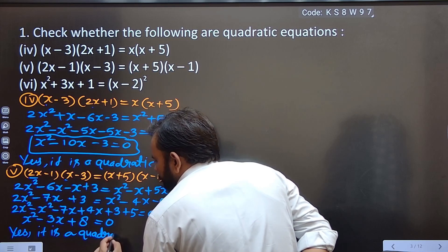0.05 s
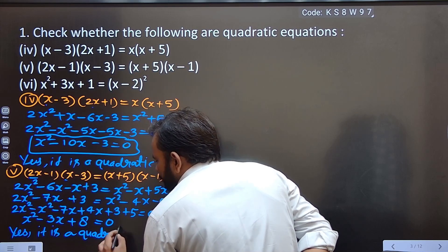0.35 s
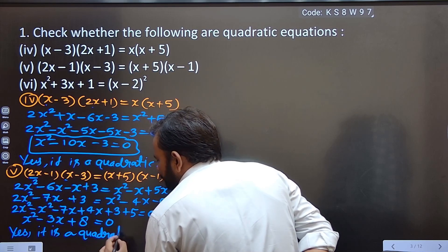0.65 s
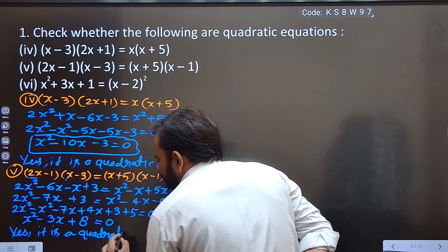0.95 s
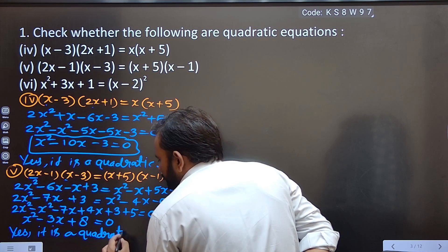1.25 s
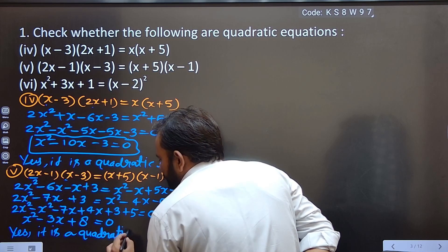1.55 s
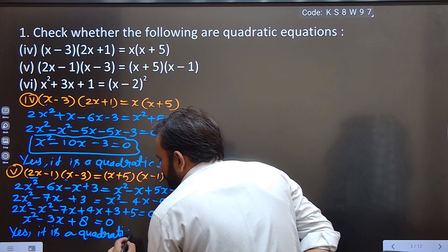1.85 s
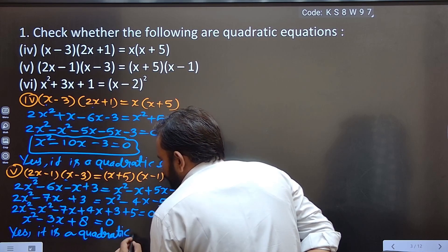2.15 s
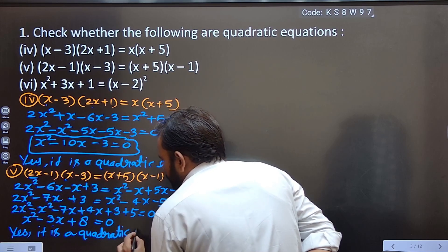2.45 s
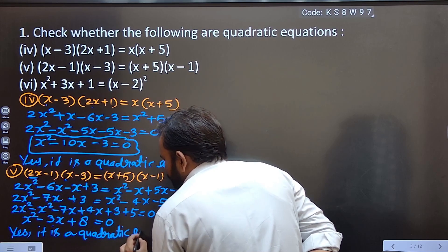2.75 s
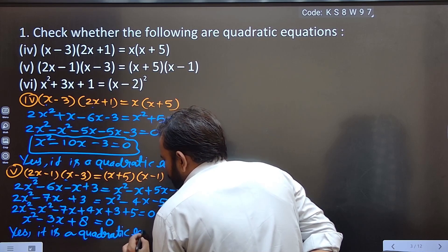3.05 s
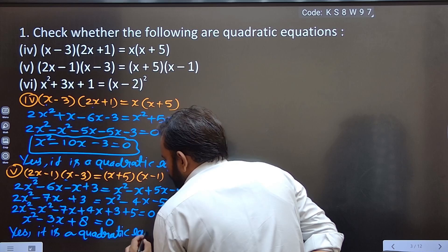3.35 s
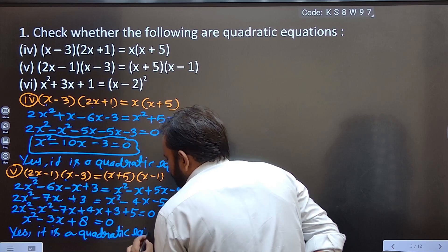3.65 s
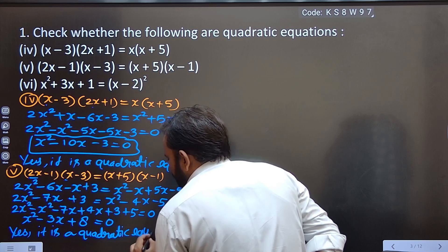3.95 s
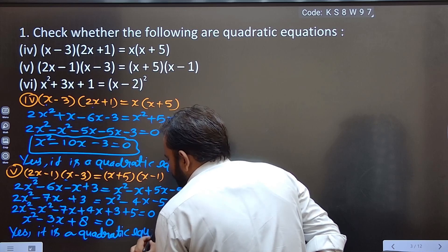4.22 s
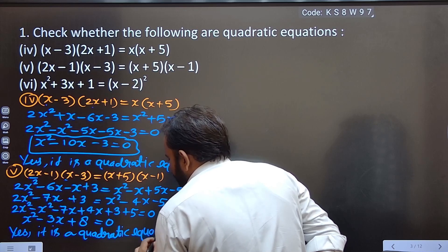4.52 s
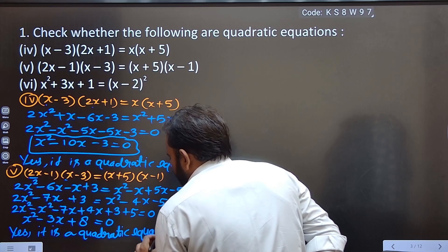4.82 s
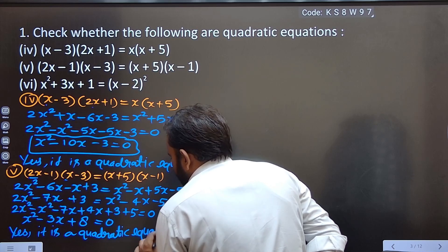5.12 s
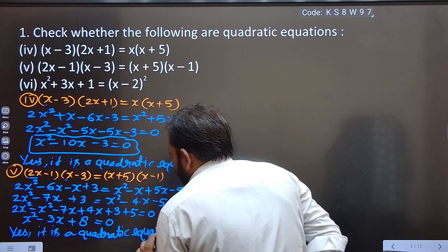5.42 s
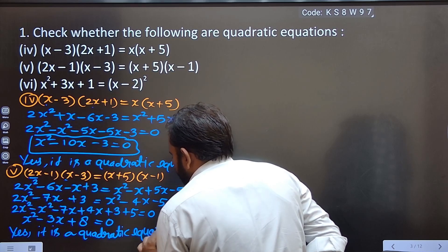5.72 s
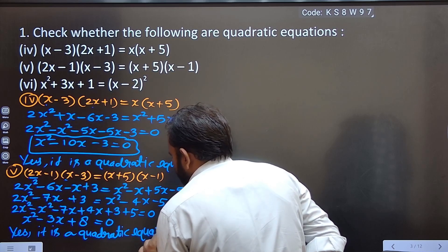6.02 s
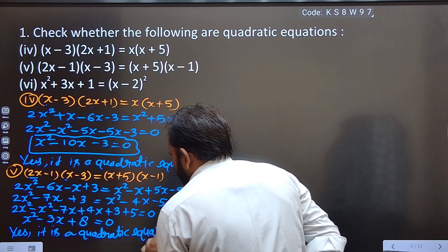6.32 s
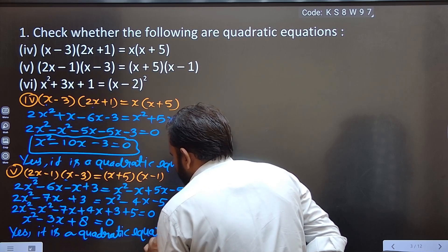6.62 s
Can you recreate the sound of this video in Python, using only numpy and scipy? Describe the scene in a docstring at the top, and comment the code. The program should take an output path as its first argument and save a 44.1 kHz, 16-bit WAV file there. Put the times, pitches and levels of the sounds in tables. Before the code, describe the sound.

Light knocks and thin, scratchy pen strokes on a large touchscreen in a quiet room with a low, throbbing hum.

```python
"""Someone writes on a large touchscreen in a quiet classroom. From the outset a low, throbbing hum with a
slight flutter lies under faint electronic whines and room air, and the sliding stylus makes a thin friction
hiss whose resonance glides through each stroke. From 0.66 s soft landings excite the modes of the glass
panel. Light ticks follow from 1.2 s, the first just before a faint stick-slip squeak. From 4 to 6.5 s the
hum's upper harmonics swell, and the hardest tap ends the scene."""
import sys
import numpy as np
from scipy import signal
from scipy.fft import rfft, irfft, next_fast_len
from scipy.io import wavfile
from scipy.ndimage import uniform_filter1d, map_coordinates

SR = 44100
rng = np.random.default_rng(int(sys.argv[2]) if len(sys.argv) > 2 else 0)


def int16_out(signal):
    """Quantize to a 16-bit WAV file."""
    q = np.round(np.clip(np.atleast_2d(signal).T, -1, 1) * 32767)
    wavfile.write(sys.argv[1], SR, q.astype(np.int16))


N = 302967


def amp(db):
    """Amplitude ratio of a level in decibels."""
    return 10 ** (np.asarray(db) / 20)


def unit(x):
    """Normalisation to rms 1."""
    return x / np.sqrt(np.mean(x ** 2) + 1e-20)


def along(points, hz):
    """Interpolation of (frequency, value) points on a logarithmic frequency axis."""
    f, v = np.transpose(points)
    return np.interp(np.log(hz + 1), np.log(f + 1), v)


def wobble(rate):
    """Smooth random modulation: a spline through rate Gaussian knots a second."""
    return map_coordinates(rng.standard_normal(int(N * rate / SR) + 4), [np.arange(N) * rate / SR])


def filtered(x, response):
    """Linear filtering: the spectrum of x times a frequency response."""
    size = next_fast_len(x.shape[-1] + 8192)
    return irfft(rfft(x, size) * response(np.fft.rfftfreq(size, 1 / SR)), size)[..., :x.shape[-1]]


def noise(spectrum):
    """Spectral shaping of white noise, at rms 1."""
    return unit(filtered(rng.standard_normal(N), lambda hz: amp(along(spectrum, hz))))


def narrow(width_hz, size=N):
    """Complex envelope of narrow-band noise with this half width."""
    half = lambda: filtered(rng.standard_normal(size), lambda hz: 1 / (1 + (hz / width_hz) ** 3))
    return unit(half()) + 1j * unit(half())


def band(envelope, hz):
    """Modulation shifts a complex envelope to a steady or gliding centre frequency."""
    return np.real(envelope * np.exp(2j * np.pi * np.cumsum(hz + np.zeros(len(envelope))) / SR))


def add(track, s, sound):
    """Superposition of a sound on the track at time s."""
    part = track[max(round(s * SR), 0):][:len(sound)]
    part += sound[:len(part)]


# lower and upper harmonics of the hum: (harmonic number, level [dB])
LOW_HARMONICS = [(1, -44.5), (2, -53), (3, -65.5)]
UPPER_HARMONICS = [(4, -69.5), (5, -65), (6, -66.5), (7, -79), (8, -75.5), (9, -76)]
# mains lines and electronic whines: (frequency [Hz], level [dB])
WHINES = [(50, -63.5), (100, -66.5), (124, -73.5), (200, -79), (300, -76), (339, -76), (362, -87.5),
          (449, -80.5), (1582, -93.5), (2272, -99.5), (7897, -102), (7998, -100), (11719, -111),
          (13706, -109)]
HUM_HZ, UPPER_DELAY_S, UPPER_REST_DB = 30, .0173, -0.65
SWELL_START_S, SWELL_END_S, SWELL_DB = 4.02, 6.48, 3.87


def hum():
    """A harmonic series, amplitude-modulated every fourth cycle and pulsed every twelfth, with whines."""
    t = np.arange(N) / SR

    def tone(hz, db, delay):
        """A sinusoid with slow random amplitude and phase modulation."""
        return amp(db + 1.1 * wobble(3.4)) * np.cos(2 * np.pi * hz * (t - delay) + .35 * wobble(3))

    cycle = HUM_HZ * (t - .105)
    buzz = -sum(amp(db + 0.2 * wobble(3.5)) * np.cos(2 * np.pi * k * cycle) for k, db in LOW_HARMONICS)
    throb = np.cos(2 * np.pi * cycle / 4)
    from_kick_s = ((cycle + 6) % 12 - 6) / HUM_HZ
    kick = amp(-43) * np.exp(-(from_kick_s / 0.0077) ** 2)
    progress = np.clip((t - SWELL_START_S) / (SWELL_END_S - SWELL_START_S), 0, 1)
    swell = np.sqrt(np.abs(np.sin(np.pi * progress)))
    # harmonics in phase add up to one soft pulse a cycle
    drone = sum(tone(k * HUM_HZ, db, UPPER_DELAY_S) for k, db in UPPER_HARMONICS)
    drone *= amp(UPPER_REST_DB + SWELL_DB * swell)
    whines = sum(tone(hz, db, rng.uniform()) for hz, db in WHINES)
    return buzz * (1 + 0.028 * throb) - amp(-60.5) * throb - kick + drone + whines


# three impulses in each cycle of the hum: (delay [s], level [dB])
FLUTTER_IMPULSES = [(.0116, -67), (.0173, -60.7), (.0278, -68.5)]
# the modes they excite: (frequency [Hz], relative level [dB], 60 dB decay time [s])
FLUTTER_RESONANCES = [(330, -6, .02), (660, 0, .014), (1350, -4, .008)]


def flutter():
    """A jittered impulse train in step with the hum excites damped modes: tiny, dull, uneven ticks."""
    impulses, t = np.zeros(N), np.arange(SR // 25) / SR
    ring = sum(amp(db - 60 * t / t60) * np.sin(2 * np.pi * hz * t) for hz, db, t60 in FLUTTER_RESONANCES)
    ring *= 1 - np.exp(-t / .0008)
    cycles = np.arange(0, N / SR, 1 / HUM_HZ)
    for delay, db in FLUTTER_IMPULSES:
        late, size = rng.standard_normal((2, len(cycles)))
        at = np.round((cycles + delay + .0004 * late) * SR).astype(int)
        impulses[np.clip(at, 0, N - 1)] += amp(db + 2 * size)
    return signal.fftconvolve(impulses, ring)[:N]


# room noise: (frequency [Hz], relative spectral density [dB])
AIR_SPECTRUM = [(15, -17), (30, -2.5), (65, -16.5), (100, -15), (170, -21.5), (250, -26.5), (400, -29.5),
                (600, -36.5), (1000, -43.5), (1300, -50.5), (1620, -51.5), (2000, -54), (5000, -60.5),
                (8000, -84)]


def air():
    """Ambient noise, nearly stationary, with its energy at low frequencies."""
    return noise(AIR_SPECTRUM) * amp(-55 + 0.77 * wobble(11))


# hiss common to both channels: (frequency [Hz], relative spectral density [dB])
HISS_SPECTRUM = [(2500, -0.5), (4500, -11.5), (5500, -2.5), (6700, 3), (8000, 0), (9300, -3), (11000, -4.5),
                 (13500, -5), (15700, -2.5)]


def hiss():
    """Electronic noise floor: an in-phase and an antiphase part make the channels partly coherent."""
    common = amp(-84.5) * noise(HISS_SPECTRUM)
    side = amp(-90) * noise([(30, 25.5), (100, 2), (300, -52), (600, -3),
                             (2000, 7.5), (8000, 10), (15000, 10.5)])
    return np.array([common + side, common - side])


def patchy(x, depth_db):
    """Random gain over time and frequency makes resonances come and go."""
    spectra = signal.stft(x, nperseg=256)[2]
    field = uniform_filter1d(rng.standard_normal(spectra.shape), size=4, axis=0)
    field = uniform_filter1d(field, size=22, axis=1)
    return signal.istft(spectra * amp(depth_db * unit(field)), nperseg=256)[1][:N]


# slides of the tip: (start [s], duration [s], whistle level [dB], from [Hz], to [Hz], half width [Hz],
# sizzle level [dB], sizzle centre [Hz], scrape level [dB])
PEN_STROKES = [(0.0, 0.13, -85.5, 8940, 7660, 700, -88, 12500, -96),
               (0.12, 0.16, -85, 9700, 9500, 1200, -82.5, 12700, -91),
               (0.318, 0.16, -79, 9600, 8000, 1100, -84, 12700, -90),
               (0.71, 0.091, -84.5, 8400, 8250, 1000, -81.5, 13600, -89),
               (0.984, 0.1, -83, 8800, 8700, 1110, -88, 13100, -90),
               (1.607, 0.064, -81.5, 9500, 9450, 800, -80.5, 13300, -79.5),
               (1.673, 0.087, -79.5, 8840, 7700, 700, -86, 13000, -91),
               (2.19, 0.17, -86, 7900, 7480, 600, -82.5, 12900, -86),
               (2.395, 0.16, -79, 8930, 7760, 900, -84, 13600, -86),
               (2.715, 0.068, -83.5, 7840, 7400, 500, -86, 13800, -88),
               (2.746, 0.12, -84, 9160, 7700, 800, -88, 12900, -90),
               (2.857, .1, -96, 8200, 8000, 800, -91, 12300, -95),
               (3.029, 0.14, -80.5, 8550, 8350, 1000, -88, 13300, -85),
               (3.391, 0.11, -85, 8600, 8300, 900, -90, 13200, -85),
               (3.48, .19, -91, 8300, 8100, 1100, -91, 12800, -86),
               (3.686, 0.11, -84.5, 8000, 8300, 800, -92, 13400, -84),
               (3.988, 0.12, -86, 8870, 7900, 1000, -90, 13300, -83),
               (4.29, 0.21, -92, 8360, 7730, 800, -87.5, 12260, -87.5),
               (4.495, 0.11, -87, 7500, 7300, 700, -81, 12600, -87),
               (4.647, 0.15, -87, 8370, 8200, 900, -81, 13000, -84),
               (5.004, 0.064, -92, 7700, 7600, 900, -87, 12200, -89),
               (5.193, 0.093, -84, 7880, 8000, 450, -83, 12600, -85),
               (5.3, 0.16, -91, 8330, 8100, 1300, -99, 12500, -91),
               (5.743, 0.12, -88, 8170, 7900, 500, -87, 12800, -86),
               (5.96, .06, -94, 7700, 7600, 700, -91, 12500, -94),
               (6.122, 0.095, -92, 7460, 7370, 600, -87, 11600, -93),
               (6.26, 0.1, -92, 7900, 8050, 500, -90, 13000, -86),
               (6.41, 0.14, -95, 7840, 7800, 800, -96, 12000, -99),
               (6.589, 0.063, -95, 8250, 8240, 700, -84, 12900, -85)]
# broadband friction: (frequency [Hz], relative spectral density [dB])
SCRAPE_SPECTRUM = [(2500, -9), (3400, -12), (3850, -3.5), (4400, -24.5), (6500, -7.5), (7400, -7.5),
                   (7950, 0.5), (8700, -8.5), (9600, -9.5), (10300, -7), (11000, -14), (12000, -10),
                   (13700, -15.5), (15000, -26)]
# the stylus colours whistle and sizzle: (frequency [Hz], half width [Hz], gain [dB])
STYLUS_RESONANCES = [(7980, 130, 6), (10200, 220, 4), (11100, 400, -2.5), (12600, 340, 0)]
RUB_HZ, RUB_DB = 3820, -14.5  # a lower stylus resonance, relative to the whistle
CORE_DB, CORE_WIDTH_HZ, CORE_GLIDE_HZ = -3.5, 200, 1200  # the whistle's core is full at this glide


def strokes():
    """Sliding friction follows the tip's speed: a broad scrape, a gliding whistle and a high sizzle."""
    t = np.arange(N) / SR
    scrape = noise(SCRAPE_SPECTRUM)
    rub = band(narrow(width_hz=160), RUB_HZ)
    sizzle = narrow(width_hz=1800)
    graze = amp(-96.5 + 5 * wobble(5.7))  # the tip brushes the glass even between strokes
    friction = graze * (scrape + amp(-5) * band(sizzle, hz=12370))
    singing = np.zeros(N)
    for start, length, whistle_db, from_hz, to_hz, width_hz, sizzle_db, sizzle_hz, scrape_db in PEN_STROKES:
        on = (t > start - .012) & (t < start + length + .012)
        progress = np.linspace(0, 1, on.sum())
        speed = np.abs(np.sin(np.pi * progress ** 0.91)) ** 0.97  # rises faster than it falls
        # on curved strokes, which glide far, a purer core sings inside the hiss
        core = amp(CORE_DB) * min(abs(from_hz - to_hz) / CORE_GLIDE_HZ, 1)
        chatter = narrow(width_hz, size=SR // 2) + core * narrow(CORE_WIDTH_HZ, size=SR // 2)
        chatter = chatter[:len(progress)] / np.hypot(1, core)
        whistle = band(chatter, from_hz + (to_hz - from_hz) * progress) + amp(RUB_DB) * rub[on]
        singing[on] += speed * (amp(whistle_db) * whistle + amp(sizzle_db) * band(sizzle[on], sizzle_hz))
        friction[on] += speed * amp(scrape_db) * scrape[on]
    colour = lambda f: amp(sum(db / (1 + ((f - hz) / width) ** 2) for hz, width, db in STYLUS_RESONANCES))
    friction += filtered(singing, colour)
    return patchy(friction, depth_db=2.1) * amp(0.23 + 1.1 * wobble(130))  # the tip catches unevenly


# impacts: (time [s], level [dB], relative click level [dB], relative ring level [dB],
# relative middle mode level [dB], lowest knock mode [Hz])
LANDINGS = [(0.6607, -48, -9, 4.5, -8, 394), (1.244, -47.5, -14, 4.5, -7, 396),
            (1.567, -46.5, -15, 3.5, -2.5, 340), (2.13, -46, -14, 1, -2, 345),
            (2.6739, -49.5, -32, 1, -16, 410), (3.369, -50, -8, -0.5, -3, 420),
            (3.9692, -49, -8.5, -1, -1, 372), (4.9422, -44.5, -16, 0.5, -3, 370),
            (5.427, -46, -12.5, 2.5, 1, 336), (5.7111, -50, -9, 0, -2, 300),
            (6.7896, -38, -10.5, 1.5, 1.5, 378)]
# the panel's upper knock modes and its ringing modes:
# (frequency [Hz], relative level [dB], 60 dB decay time [s])
KNOCK_MODES = [(663, 3, 0.015), (1460, -10, 0.008)]
RING_MODES = [(126.5, -19, 0.49), (206, -21.5, .8), (241.8, -20, 0.35), (284, -17.5, .45), (311, -16, .5),
              (326, -18, .55), (347, -17.5, .45), (364, -21.5, .45), (393, -19.5, .45), (412, -18, .5),
              (440, -23.5, 0.4), (468, -26.5, .4), (632, -30, .35), (712, -27.5, 0.35), (782, -33, .3)]
# tip on glass, and the wash of crowded panel modes: (frequency [Hz], relative spectral density [dB])
CLICK_SPECTRUM = [(800, -18), (1800, 6), (3500, -4), (5000, -7.5), (8000, -6), (11000, -14), (15000, -27)]
WASH_SPECTRUM = [(130, -25), (260, -2.5), (400, 6.5), (520, 1), (600, -4.5), (720, -6), (900, -11.5),
                 (1150, -27), (2500, -32), (5000, -43.5)]
# the knock returns again and again at roughly 10 ms spacing: (delay [s], relative level [dB])
REFLECTIONS = [(0.01, -8.5), (0.0195, -13), (0.0303, -10.5), (.0405, -13.5), (0.0496, -14)]
THUD_DB, THUD_T60_S, MIDDLE_HZ, MIDDLE_T60_S = 6, 0.018, 524, 0.016  # the two lowest knock modes


def taps():
    """Impact excitation: each landing sets the panel's damped modes ringing under a short click."""
    out, t = np.zeros(N), np.arange(SR // 2) / SR
    clicks, washes = noise(CLICK_SPECTRUM), noise(WASH_SPECTRUM)
    excerpt = lambda x: np.roll(x, rng.integers(N))[:len(t)]
    for s, db, click_db, ring_db, middle_db, thud_hz in LANDINGS:
        low_modes = [(thud_hz, THUD_DB, THUD_T60_S), (MIDDLE_HZ, middle_db, MIDDLE_T60_S)]
        hz, mode_db, t60 = np.transpose(low_modes + KNOCK_MODES + RING_MODES)[:, :, None]
        ringing = t60 > .05
        # the spot struck sets each mode's strength; long modes build up as waves cross the glass
        strength = amp(mode_db + ringing * (ring_db + rng.normal(0, 2, hz.shape)) - 60 * t / t60)
        rise = 1 - np.exp(-t / np.where(ringing, .012, .0007))
        phase = ringing * rng.uniform(0, 2 * np.pi, hz.shape)
        modes = strength * rise * np.sin(2 * np.pi * hz * t + phase)
        wash = excerpt(washes) * amp(ring_db - 18.5 - 60 * t / 0.29) * (1 - np.exp(-t / 0.0029))
        cutoff_hz = 10100 + 500 * (db + 52)  # harder landings click brighter
        click = filtered(excerpt(clicks), lambda f: 1 / np.sqrt(1 + (f / cutoff_hz) ** 10))
        click *= amp(click_db - 11.5 - 60 * t / 0.043)
        add(out, s, amp(db) * (modes.sum(axis=0) + wash + click))
        dull_knock = np.sum(modes * ~ringing / (1 + (hz / 600) ** 2), axis=0)
        for delay, echo_db in REFLECTIONS:
            add(out, s + delay, amp(db + echo_db) * dull_knock)
    return out


# decay of the classroom: (frequency [Hz], reverberation time [s])
REVERB_TIMES = [(150, 0.49), (400, 0.32), (800, 0.16), (2000, 0.42), (10000, 0.43)]


def room(x):
    """Diffuse reverberation: convolution with noise that decays exponentially, fastest near 800 Hz."""
    hz, t, spectra = signal.stft(rng.standard_normal(SR // 2), SR, nperseg=256)
    decay = amp(-60 * t / along(REVERB_TIMES, hz)[:, None])
    tail = signal.istft(spectra * decay, SR, nperseg=256)[1]
    response = np.pad(tail / np.linalg.norm(tail), (SR // 200, 0))  # arrives 5 ms late
    return signal.fftconvolve(x, response)[:N]


# light touches of the tip on the glass: (time [s], level [dB], frequency [Hz])
TIP_TICKS = [(1.2027, -65, 3750), (2.1305, -68.5, 8800), (3.075, -72, 2600), (4.819, -72, 3700)]
TICK_OCTAVE_DB, TICK_T60_S = -5, 0.0078


def ticks():
    """Grazing contacts give transients: milliseconds of narrow-band noise with a weaker octave."""
    out, t = np.zeros(N), np.arange(SR // 20) / SR
    grain = narrow(width_hz=750)
    burst = lambda hz: band(np.roll(grain, rng.integers(N))[:len(t)], hz)
    for s, db, hz in TIP_TICKS:
        tick = burst(hz) + amp(TICK_OCTAVE_DB) * burst(2 * hz)
        add(out, s, tick * amp(db - 60 * t / TICK_T60_S))
    return out


# course of the squeak: (time [s], frequency [Hz], level [dB])
SQUEAK_PATH = [(1.24, 8060, -102), (1.27, 8260, -91), (1.327, 8560, -87), (1.355, 8300, -91),
               (1.38, 8200, -115)]


def squeak():
    """Stick-slip oscillation: on one curve the tip whistles faintly over a dry rasp."""
    t = np.arange(N) / SR
    s, hz, db = np.transpose(SQUEAK_PATH)
    pitch = np.interp(t, s, hz) + 70 * wobble(400)
    whistle = np.sin(2 * np.pi * np.cumsum(pitch) / SR)
    rasp = noise([(6000, -30), (7800, 0), (8400, 0), (10000, -30)])
    envelope = amp(np.interp(t, s, db)) * (t > s[0]) * (t < s[-1])
    return envelope * (whistle + amp(-3) * rasp)


def scene():
    """Superposition at one microphone, heard in two hissing channels; only taps and ticks reverberate."""
    contacts = taps() + ticks()
    mono = contacts + amp(-7) * room(contacts) + strokes() + squeak() + hum() + flutter() + air()
    return (mono + hiss()) * amp([[-.17], [.17]])


# resting value of each converter, left then right: (offset [full scale])
DC_OFFSET = [
    [-.0153],
    [-.0239],
]
BAND_LIMIT_HZ = 15700


def record(dry):
    """Band limiting by an ideal low-pass filter, plus the converters' small constant offset."""
    return filtered(dry, lambda hz: hz < BAND_LIMIT_HZ) + np.array(DC_OFFSET)


dry = scene()
out = record(dry)
int16_out(out)
```